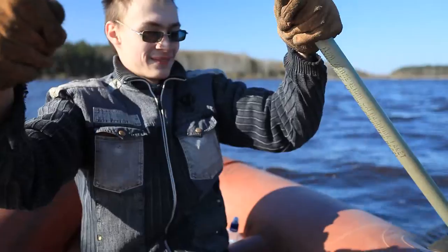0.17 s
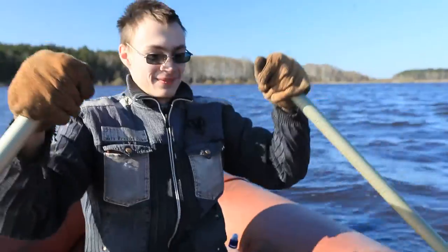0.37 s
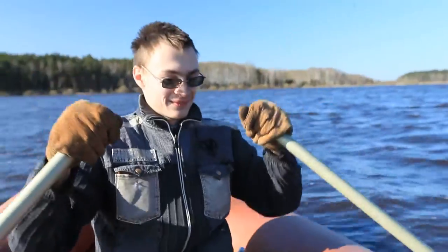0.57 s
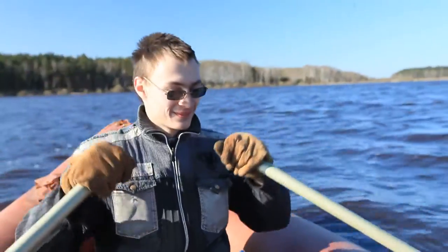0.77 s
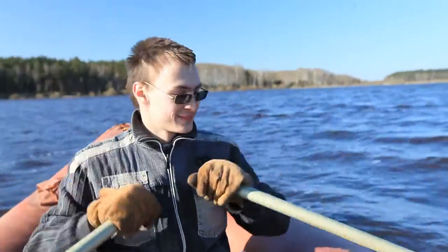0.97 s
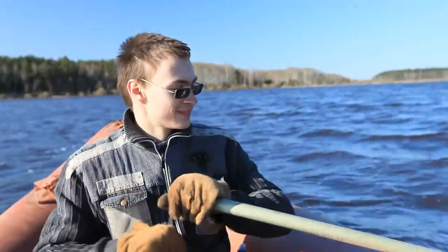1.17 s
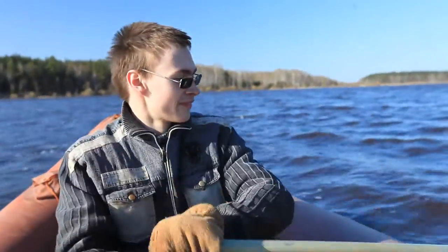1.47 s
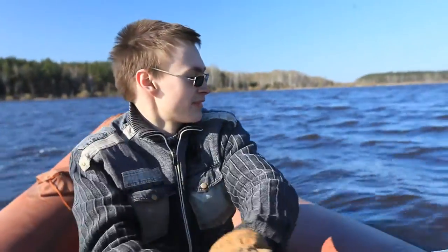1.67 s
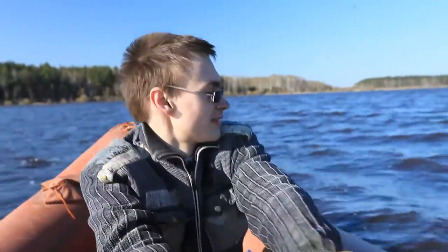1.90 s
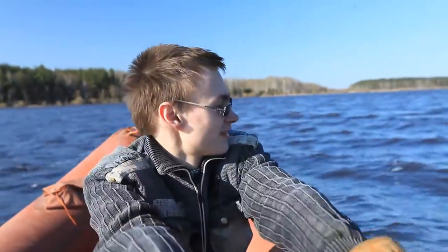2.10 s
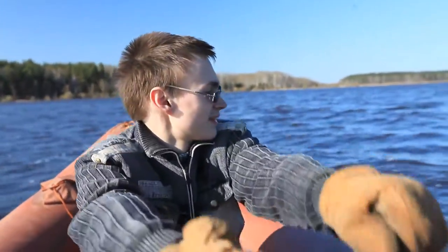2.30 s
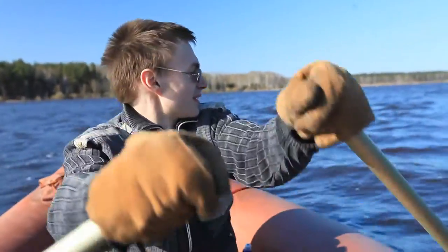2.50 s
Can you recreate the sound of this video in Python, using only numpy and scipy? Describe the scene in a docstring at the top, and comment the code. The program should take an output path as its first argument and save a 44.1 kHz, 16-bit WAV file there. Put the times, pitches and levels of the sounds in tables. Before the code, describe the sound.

Water splashes and gurgles close by as oars work beside a rubber boat; sharp spatter first, wind thumps strongest before one second, then bubbly trickling and another crisp splash past two seconds, outdoors, microphone aboard.

```python
"""On a choppy lake in a rubber boat being rowed, the microphone aboard.
Wind on the microphone port is low, lumpy noise in bands; eddies thump there as short wavering swings.
Water runs off the blades and laps at the hull: wash is flickering band noise, fizz is many small ringing
bubbles, spray is treble ticks. Close by, single bubbles ring and rise in pitch, spatters are grainy
noise bursts, and one drop falls into a filling hollow with an upward glide."""
import sys
import numpy as np
from scipy import signal
from scipy.io import wavfile

SR = 44100
rng = np.random.default_rng(int(sys.argv[2]) if len(sys.argv) > 2 else 0)


def log_audio(samples):
    """Write samples as a 16-bit WAV file to the path given in sys.argv[1]."""
    # one column per channel
    frames = np.atleast_2d(samples).T
    # limit to full scale, then quantise
    limited = np.clip(frames, -1, 1)
    pcm = np.round(limited * 32767).astype(np.int16)
    wavfile.write(sys.argv[1], SR, pcm)


def decibels_to_gain(level_db):
    """Convert a level in decibels to a linear amplitude gain (20 dB per decade)."""
    exponent = np.asarray(level_db, float) / 20
    return 10 ** exponent


N = 116865

# how stirred the water is: start_s, level_db (before each layer's trim), fizz_db (added for the fizz, limited there)
STIR = [(.16, -35, -5.5), (.2, -38.5, -6), (.27, -28.5, -11), (.4, -34, 3.5), (.53, -29.5, -1),
        (.71, -34, -9), (.8, -37.5, -11), (1.03, -34.5, -28), (1.1, -29, -1), (1.3, -33, 3),
        (1.42, -31, 4.5), (1.55, -35, -25), (1.75, -34.5, -3.5), (1.92, -34, -11), (2.08, -28.5, -15),
        (2.2, -33.5, 11), (2.31, -31, -7), (2.42, -34, -11), (2.65, -31.5, -5)]


def in_time(rows):
    """Joins each column by straight lines over time; the first column is in seconds."""
    s, *columns = np.transpose(rows)
    return [np.interp(np.arange(N) / SR, s, column) for column in columns]


def rms_one(x):
    """Scales a signal to unit rms."""
    return x / np.sqrt(np.mean(x ** 2) + 1e-20)


def drift(rate_hz):
    """Slow random wandering of unit spread: noise through two equal low-pass poles at rate_hz."""
    pole = np.exp(-40 * np.pi * rate_hz / SR)  # runs at a twentieth of the sample rate
    noise = rng.standard_normal(N // 20 + 2002)
    slow = signal.lfilter([1], [1, -2 * pole, pole ** 2], noise)[2000:]  # skip the run-in
    return np.interp(np.arange(N) / 20, np.arange(len(slow)), rms_one(slow - slow.mean()))


def band(x, low_hz, high_hz):
    """Band-pass filter with gentle slopes."""
    sos = signal.butter(2, [low_hz, min(high_hz, .45 * SR)], "band", fs=SR, output="sos")
    return signal.sosfilt(sos, x)


def banded_noise(spectrum, edges, shared_db, own_db, own_rate_hz, tilt_db):
    """Unit-rms noise in bands: a colour, a shared and an own flicker, and a tilt in dB per octave."""
    out = 0
    white = rng.standard_normal((2, N))  # neighbouring bands use different noise
    hz, db = np.transpose(spectrum)
    centre = np.sqrt(edges[0] * edges[-1])
    for k, (low, high) in enumerate(zip(edges, edges[1:])):
        mid = np.sqrt(low * high)
        colour_db = np.interp(np.log(mid), np.log(hz), db)
        flicker_db = shared_db + own_db * drift(own_rate_hz)
        slope_db = np.clip(tilt_db, -4, 4) * np.log2(mid / centre)
        out = out + decibels_to_gain(colour_db + flicker_db + slope_db) * band(white[k % 2], low, high)
    return rms_one(out)


def add(out, s, x):
    """Mixes x into out from time s in seconds."""
    i = int(s * SR)
    out[i:i + len(x)] += x[:N - i]


def wind():
    """Wind on the microphone port: lumpy low noise that brightens as it strengthens."""
    # wind strength at the port: start_s, level_db
    gusts = [(.17, -22), (.3, -23.5), (.42, -21.5), (.52, -25), (.7, -19.5), (.765, -12), (.808, -23.5),
             (.845, -24), (.865, -16.5), (.89, -14), (.97, -18), (1.02, -23.5), (1.1, -17), (1.2, -27.5),
             (1.24, -43), (1.28, -29.5), (1.31, -52), (1.39, -33.5), (1.43, -55), (1.49, -46), (1.53, -21),
             (1.7, -25.5), (1.8, -44.5), (2.06, -36.5), (2.1, -23.5), (2.14, -33), (2.4, -24.5),
             (2.48, -39.5), (2.65, -28)]
    # colour of the wind noise: frequency_hz, density_db (per Hz)
    gust_colour = [(15, -46), (25, -18.5), (74, 4.5), (194, 5.5), (294, -3), (389, -12.5), (532, -26.5),
                   (860, -20), (934, -48), (1300, -33), (1690, -65), (2860, -120)]
    level_db, = in_time(gusts)
    tilt_db = 0.33 * (level_db + 14)  # per octave; no tilt at -14 dB
    edges = np.geomspace(22, 1400, 13)
    lumps_db = 2.2 * drift(30)
    return decibels_to_gain(level_db) * banded_noise(gust_colour, edges, lumps_db, 2.3, 42.5, tilt_db)


def wash():
    """Churned water at blades and hull: patchy noise whose level follows the stir."""
    # colour of the wash: frequency_hz, density_db (per Hz)
    wash_colour = [(240, -30), (400, -15.5), (482, -5.5), (521, -14), (581, -9.5), (1200, -7), (1670, -9),
                   (1800, -5), (4650, -13.5), (14700, -43), (16300, -42)]
    trim_db = -5.0
    level_db, _ = in_time(STIR)
    edges = np.geomspace(400, 16800, 15)
    patchy_db = 1.2 * drift(20)
    return decibels_to_gain(level_db + trim_db) * banded_noise(wash_colour, edges, patchy_db, 1.5, 30, 0)


def fizz():
    """Small bubbles in clumps, each swelling and ringing at one of 28 pitches."""
    # colour of the fizz: frequency_hz, level_db
    fizz_colour = [(1100, -2.5), (1800, 6.5), (3000, 3), (5000, 6), (6000, -16), (8000, -12.5)]
    usual_per_s, trim_db, ring_cycles, size_spread_db = 1700, -3.0, 22.0, 3.2
    colour_hz, colour_db = np.transpose(fizz_colour)
    level_db, fizz_db = in_time(STIR)
    sizes_db = size_spread_db * np.minimum(rng.exponential(1, N), 4)
    sizes = decibels_to_gain(sizes_db) * rng.choice([-1, 1], N)
    born = rng.random(N) < usual_per_s * decibels_to_gain(5.0 * drift(15)) / SR
    dealt = rng.integers(0, 28, N)  # which pitch each bubble gets
    out = 0
    for k, hz in enumerate(np.geomspace(1150, 8000, 28)):
        r = decibels_to_gain(-60 * hz / (ring_cycles * SR))  # falls 60 dB in ring_cycles
        w = 2 * np.pi * hz / SR
        ring = sizes * born * (dealt == k) + 1e-18
        for pole in (r, r ** 3):  # the second, faster resonance softens the onset
            gain = (1 - pole ** 2) / 2
            ring = signal.lfilter([gain, 0, -gain], [1, -2 * pole * np.cos(w), pole ** 2], ring)
        pitch_db = np.interp(np.log(hz), np.log(colour_hz), colour_db)
        out = out + decibels_to_gain(pitch_db) * ring / np.sqrt(1 - r)
    return decibels_to_gain(level_db + trim_db + np.clip(fizz_db, -3, 6)) * rms_one(out)


def spray():
    """Fine droplets land as very short noise ticks, in clumps, each in one treble band."""
    # how much spray falls: start_s, level_db
    spray_level = [(.16, -92), (.6, -48), (1.04, -65), (1.12, -58), (1.36, -45), (1.5, -52.5),
                   (1.62, -46.5), (1.84, -47), (1.89, -38.5), (2.1, -42), (2.3, -47), (2.4, -54.5),
                   (2.65, -51)]
    # treble bands of the ticks: low_hz, high_hz, level_db
    tick_bands = [(4000, 6000, 0), (5500, 7000, -1), (6500, 8300, -2), (8000, 10500, -11),
                  (10000, 13000, -16)]
    usual_per_s, t60_s = 650, .012
    clumps = decibels_to_gain(5.0 * drift(20))
    decay = decibels_to_gain(-60 / (t60_s * SR))
    out = 0
    for low, high, db in tick_bands:
        landed = rng.random(N) < usual_per_s * clumps / len(tick_bands) / SR
        hits = landed * decibels_to_gain(4.0 * rng.standard_normal(N))
        ticks = signal.lfilter([1], [1, -decay], hits + 1e-18) * rng.standard_normal(N)
        out = out + decibels_to_gain(db) * band(band(ticks, low, high), low, high)
    return decibels_to_gain(in_time(spray_level)[0]) * rms_one(out)


def spatters():
    """Water slaps down as short grainy noise with a crack, stronger in the shorter ones."""
    # spatters close by: start_s, peak_db, low_edge_hz, high_edge_hz, length_s
    slaps = [(0.153, -28.5, 900, 11700, 0.022), (0.183, -23.5, 1500, 8700, 0.0079),
             (.211, -34, 1200, 14200, 0.0048), (0.241, -9.5, 760, 7240, 0.018),
             (0.249, -8.5, 606, 14800, 0.0078), (0.253, -11.5, 600, 14000, 0.0098),
             (0.295, -28, 2020, 9000, 0.0053), (0.339, -21, 2000, 8700, 0.0076),
             (0.352, -24, 1500, 6740, 0.0015), (.62, -29.5, 5030, 15000, 0.0019),
             (0.926, -26.5, 3000, 15000, 0.0029), (0.95, -26, 5600, 8240, 0.0029),
             (1.152, -22.5, 3470, 8200, 0.014), (1.221, -17, 3950, 14000, 0.0029),
             (1.3667, -6.5, 3830, 5930, 0.0014), (1.448, -18.5, 1000, 12900, 0.015),
             (1.495, -30.5, 8500, 11100, 0.0016), (1.818, -25, 4000, 13000, 0.0027),
             (1.866, -28, 5000, 12000, 0.0062), (2.169, -9, 1900, 8000, 0.0049),
             (2.174, -7.5, 1000, 15000, 0.0097), (2.1876, -2, 1900, 7840, 0.001),
             (2.1958, -4, 2220, 8700, 0.00056), (2.209, -11.5, 1500, 14000, 0.00099),
             (2.278, -11.5, 1260, 12800, 0.0035), (2.284, -9, 534, 5200, 0.011),
             (2.632, -19.5, 1470, 11600, 0.0061)]
    cut_hz, grain_db, crack_s = 5000, 5.0, .002  # spatters shorter than crack_s are mostly crack
    out = np.zeros(N)
    softener = signal.butter(2, cut_hz, fs=SR, output="sos")
    noise = rng.standard_normal((len(slaps), 2, 2048))
    for (s, db, low, high, length), (hiss, grain) in zip(slaps, noise):
        u = np.arange(2048) / SR / length
        grains = decibels_to_gain(grain_db * np.repeat(grain, 32)[:2048])
        burst = hiss * grains * np.minimum(u * 3, 1) * np.exp(-2 * u ** 2)
        burst = burst + 8 * (crack_s / length) ** 2 * (np.arange(2048) == 8)
        burst = signal.sosfilt(softener, band(burst, low, high))
        add(out, s, decibels_to_gain(db) * burst / np.abs(burst).max())
    return out


def eddies():
    """Strong wind eddies cross the port: short swings with overtones, wavering and sagging in pitch."""
    # eddies: start_s, fundamental_db (at its height), pitch_hz (before bending), length_s
    thumps = [(.243, -16.5, 154.3, 0.038), (.312, -12.5, 198, 0.019), (.433, -15.5, 146, 0.026),
              (.457, -17.5, 166.4, 0.029), (.632, -11.5, 127.5, 0.018), (.65, -10.5, 162, 0.024),
              (.725, -5, 273, 0.017), (0.733, -6, 183, 0.016), (.747, -8, 246, 0.016),
              (.821, -9.5, 213, 0.027), (.896, -5.5, 216, 0.011), (.93, -13.5, 188, 0.017),
              (.952, -9.5, 251, 0.009), (.961, -4.5, 184, 0.0085), (.981, -7.5, 163, 0.01),
              (1.075, -13.5, 117, 0.019), (1.51, -14.5, 159, 0.022), (1.594, -14.5, 89, 0.044),
              (2.09, -11.5, 168, 0.032), (2.18, -13.5, 195, 0.0105), (2.257, -20, 164.5, 0.028),
              (2.349, -22.5, 157, 0.019), (2.438, -19, 112, 0.02), (2.615, -23.5, 210, 0.011)]
    sag, wobble, overtone_db = .12, .15, -13.5  # shares of the pitch; overtone dB per octave
    out = np.zeros(N)
    draws = rng.standard_normal((len(thumps), 8))
    for (s, db, hz, length), d in zip(thumps, draws):
        u = np.arange(int(length * SR)) / (length * SR)
        bend = 1 + sag * (.5 - u) + wobble * np.interp(u, np.linspace(0, 1, 6), d[2:])
        phase = 2 * np.pi * np.cumsum(hz * bend) / SR + np.pi * d[0]
        swing = np.sin(phase)
        for k in (2, 3, 4):
            swing = swing + decibels_to_gain(overtone_db * np.log2(k)) * np.sin(k * (phase + d[1]))
        add(out, s, decibels_to_gain(db) * np.sin(np.pi * u ** 0.92) * swing)
    return out


def bubbles():
    """Single bubbles snap open with a narrow noise burst, then ring, flutter, waver and rise in pitch."""
    # bubbles: start_s, ring_db (before decay and flutter), pitch_hz (at birth), t60_s, rise_octaves_per_s
    rings = [(.341, -23.5, 4130, 0.017, 3), (.355, -9.5, 3330, 0.005, 3), (0.3756, -4, 3550, 0.016, 4.6),
             (0.411, -21, 3670, 0.024, 2.8), (.502, -16.5, 3070, 0.036, 3.5), (.882, -24, 2470, 0.03, 2.2),
             (.893, -22, 1560, 0.068, 2), (0.925, -18.5, 2700, 0.011, 2.9), (.997, -26, 3130, 0.032, 3),
             (1.073, -7, 2430, 0.011, 3.4), (1.079, -18.5, 1430, 0.031, 3.5),
             (1.121, -15.5, 1253, 0.037, 2.9), (1.124, -15.5, 4800, 0.014, 3),
             (1.141, -18, 2370, 0.024, 3.4), (1.17, -7.5, 4900, 0.0081, 3), (1.174, -10, 3430, 0.0061, 3),
             (1.186, -22, 1716, 0.059, 4.2), (1.197, -19, 5200, 0.015, 3.3), (1.213, -15, 3780, 0.015, 3),
             (1.22, -16.5, 4900, 0.017, 3), (1.276, -18, 4800, 0.018, 4.3),
             (1.289, -18.5, 4400, 0.027, 2.5), (1.292, -32, 1710, 0.021, 2.4),
             (1.327, -15.5, 1900, 0.019, 3), (1.337, -18.5, 5080, 0.019, 3),
             (1.362, -17.5, 3430, 0.014, 2.7), (1.406, -27, 2000, 0.021, 3), (1.427, -22, 2240, 0.023, 3.3),
             (1.4455, -16, 426, 0.23, 2.09), (1.455, -14, 1330, 0.01, 3), (1.48, -21.5, 4950, 0.025, 3),
             (1.52, -19.5, 4470, 0.029, 6.7), (1.532, -20, 4670, 0.015, 3.4), (1.556, -18, 3140, 0.017, 3),
             (1.878, -24.5, 3220, 0.016, 3), (1.902, -9.5, 3860, 0.01, 3), (1.911, -21.5, 5970, 0.0024, 3),
             (1.951, -18, 4800, 0.0033, 3), (1.968, -11, 3200, 0.011, 3), (2.051, -8.5, 3045, 0.02, 3.4),
             (2.052, -16, 2140, 0.023, 3), (2.058, -10.5, 2950, 0.019, 3), (2.061, -14.5, 4400, 0.016, 3.5),
             (2.066, -24.5, 1350, 0.051, 2.7), (2.077, -19, 1846, 0.082, 0.3), (2.147, -21, 2240, 0.022, 3),
             (2.176, -13.5, 1040, 0.026, 3.2), (2.179, -6.5, 3050, 0.0067, 2.5),
             (2.187, -3, 2890, 0.0099, 3), (2.196, -10, 2680, 0.012, 3), (2.212, -12, 1985, 0.029, 3),
             (2.241, -14, 1520, 0.013, 3), (2.27, -12, 1565, 0.024, 1.6), (2.28, -5, 2030, 0.0087, 2.7),
             (2.29, -12, 1810, 0.011, 3), (2.32, -24, 2750, 0.045, 3.2), (2.329, -16, 1330, 0.029, 5.2),
             (2.624, -20.5, 1730, 0.019, 2.7), (2.632, -28.5, 422, 0.15, 2.2)]
    attack_cycles, attack_max_s = 2.5, .002
    wobble, flutter_db = .05, 2.5  # both shrink for low bubbles
    snap_db, snap_cycles = -7, 9.0  # relative to the ring, less for low bubbles; decay constant
    out = np.zeros(N)
    draws = rng.standard_normal((len(rings), 518))
    for (s, db, hz, t60, rise), d in zip(rings, draws):
        t = np.arange(int(t60 * SR)) / SR
        smallness = min(hz / 2000, 1) ** 2
        waver = 1 + wobble * smallness * np.interp(t / t60, np.linspace(0, .6, 6), d[:6])
        pitch_hz = hz * waver * 2 ** np.clip(rise * t, -.2, .5)
        ring = np.sin(2 * np.pi * np.cumsum(pitch_hz) / SR)
        attack_s = min(attack_cycles / hz, attack_max_s)
        swell = np.sin(np.pi / 2 * np.minimum(t / attack_s, 1)) ** 2
        uneven_db = flutter_db * min(hz / 1500, 1) * np.interp(t * hz / 4, np.arange(512), d[6:])
        add(out, s, decibels_to_gain(db - 60 * t / t60 + uneven_db) * swell * ring)
        cycles = np.arange(512) / SR * hz
        snap = d[6:] * np.minimum(cycles / 2, 1) * np.exp(-cycles / snap_cycles)
        snap = band(band(snap, hz / 1.4, hz * 1.4), hz / 1.6, hz * 1.6)
        add(out, s, decibels_to_gain(db + snap_db) * smallness * snap / np.abs(snap).max())
    return out


def plop():
    """A drop falls into a filling hollow: one fluttering tone gliding up, loudest past its middle."""
    # the drop: start_s, length_s, peak_db (before flutter), from_hz, to_hz
    s, length, db, from_hz, to_hz = (2.404, .069, -24, 440, 1700)
    out = np.zeros(N)
    u = np.arange(int(length * SR)) / (length * SR)
    level_db = db + 3.0 * drift(50)[:len(u)]
    swell = np.sin(np.pi * u ** 1.6) ** 1.15
    pitch_hz = from_hz * (to_hz / from_hz) ** u
    add(out, s, decibels_to_gain(level_db) * swell * np.sin(2 * np.pi * np.cumsum(pitch_hz) / SR))
    return out


def scene():
    """Wind and water around the boat, in mono, faded in quickly after a short silence."""
    start_s, fade_s = .1585, .001
    fade = np.clip((np.arange(N) / SR - start_s) / fade_s, 0, 1)
    air = wind() + eddies()
    water = wash() + fizz() + spray()
    drops = spatters() + bubbles() + plop()
    return ((air + water + drops) * fade)[None]


def low_pass(x):
    """Removes everything above the highest recorded frequency."""
    return signal.sosfilt(signal.butter(12, 16370, fs=SR, output="sos"), x)


def record(dry):
    """The microphone's signal, with peaks slightly rounded."""
    mix = 2 * np.tanh(dry / 2)
    return low_pass(mix)


dry = scene()
out = record(dry)
log_audio(out)
```